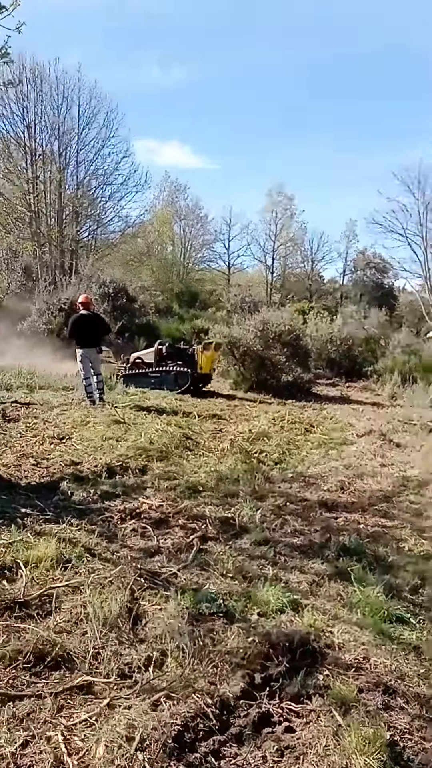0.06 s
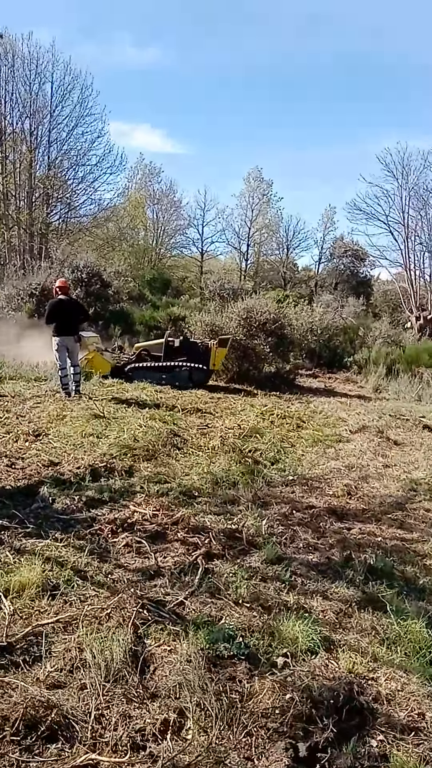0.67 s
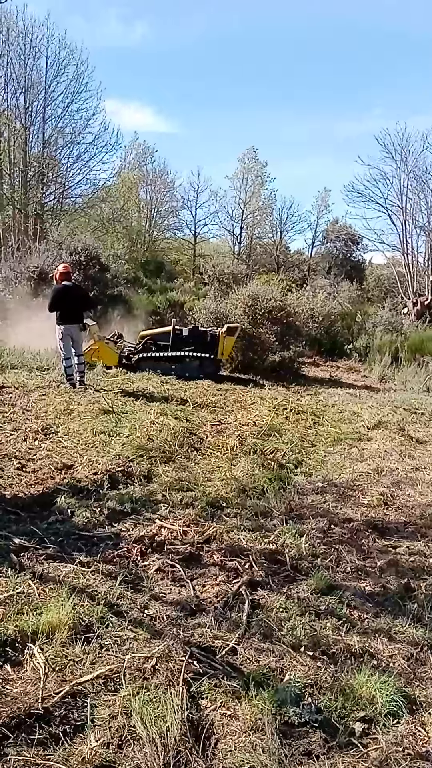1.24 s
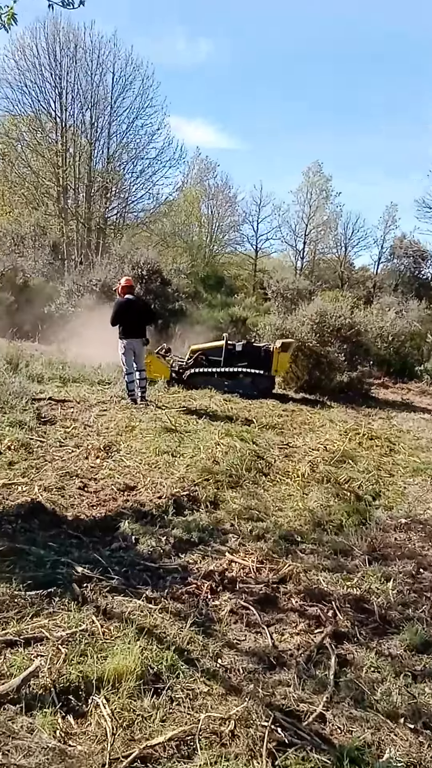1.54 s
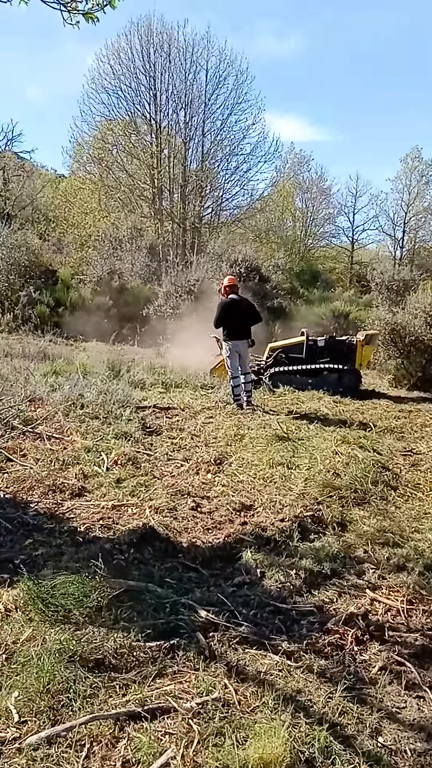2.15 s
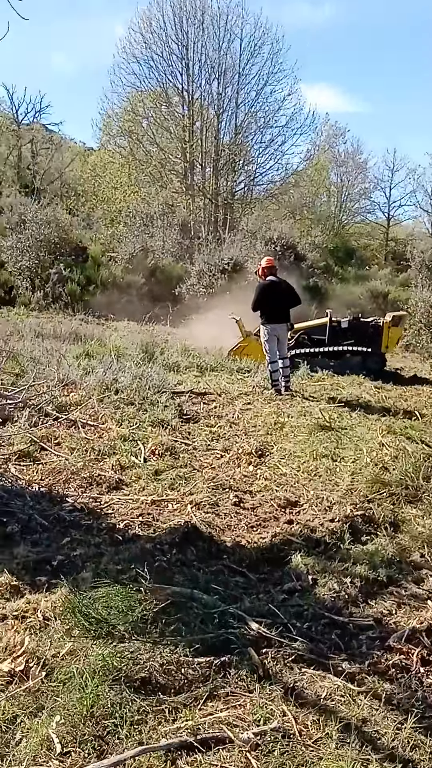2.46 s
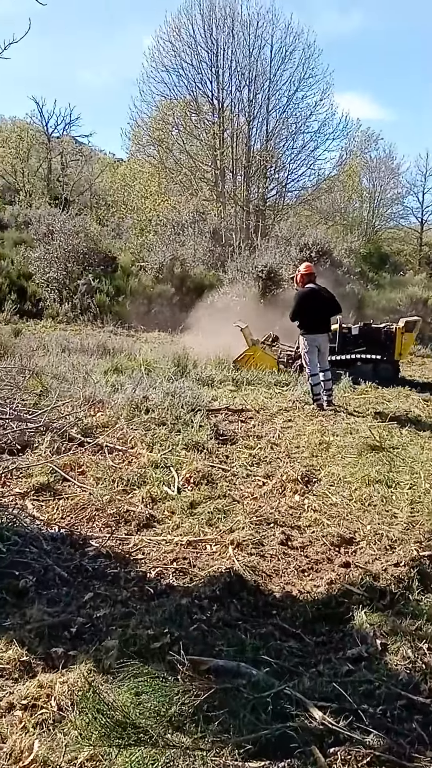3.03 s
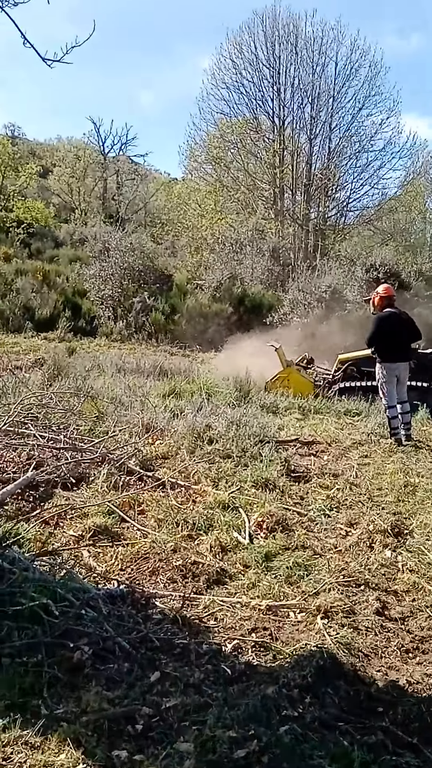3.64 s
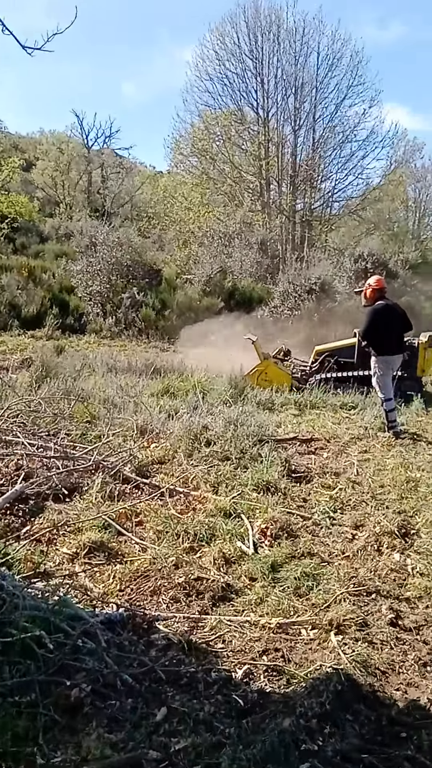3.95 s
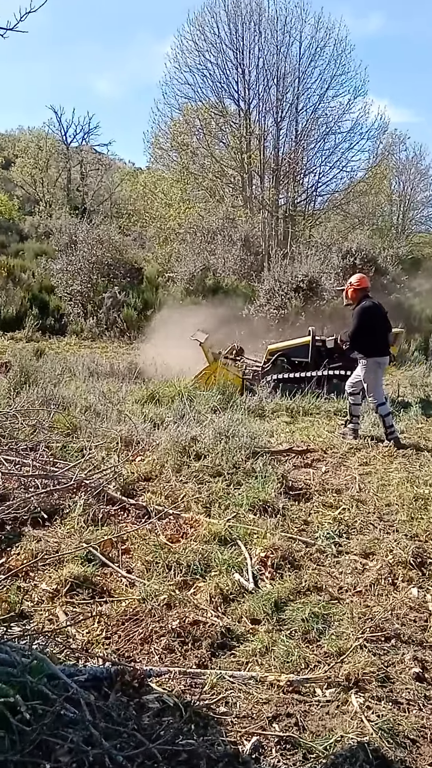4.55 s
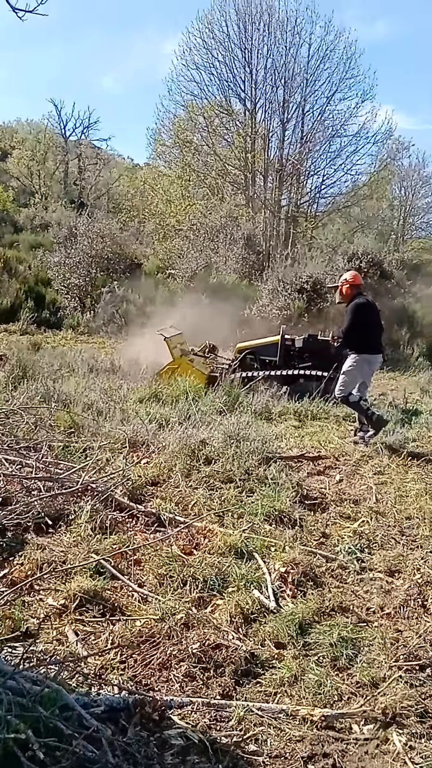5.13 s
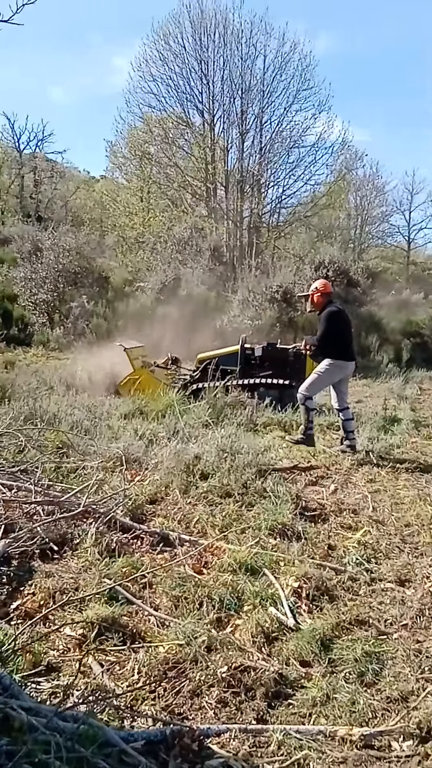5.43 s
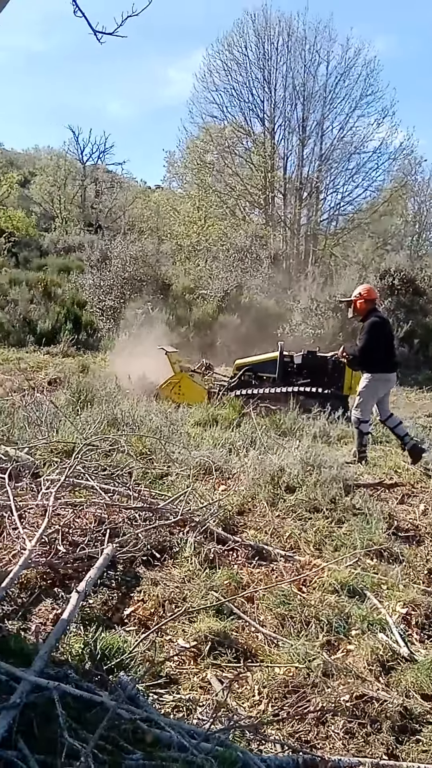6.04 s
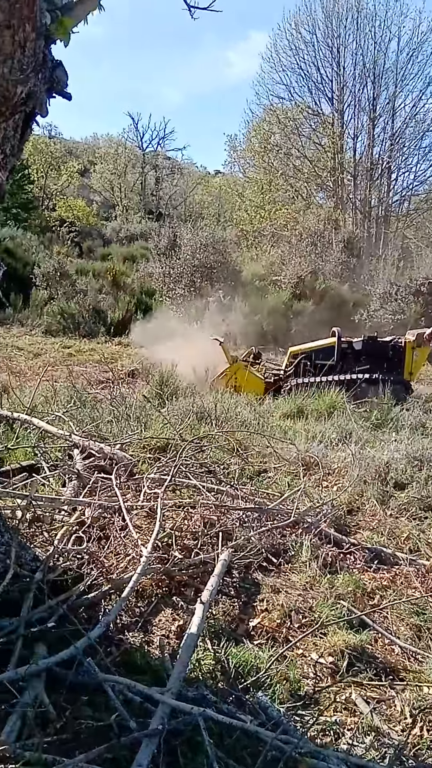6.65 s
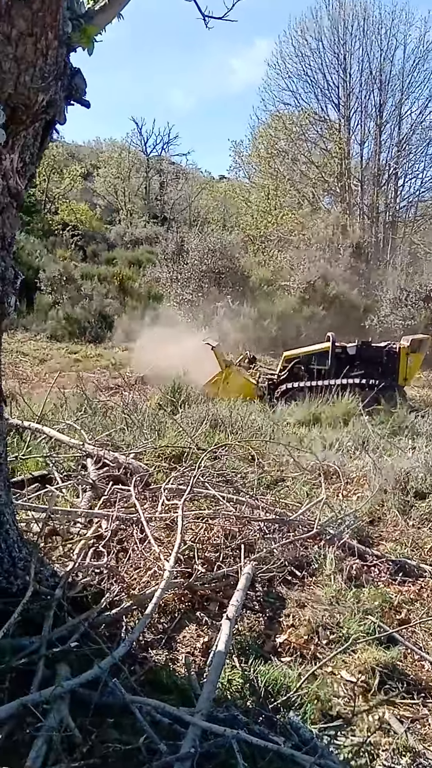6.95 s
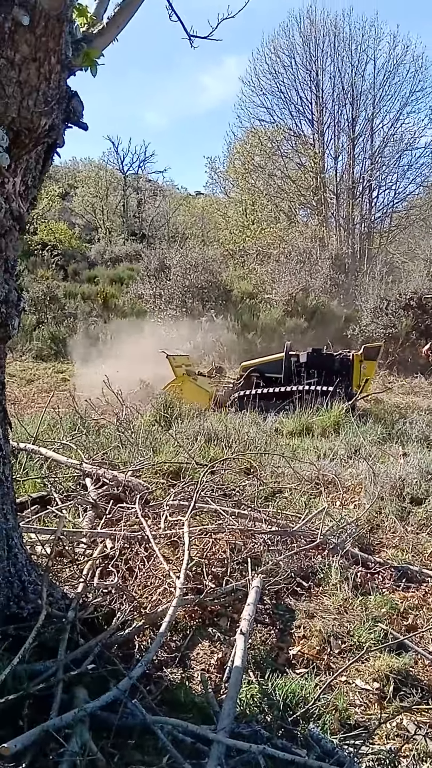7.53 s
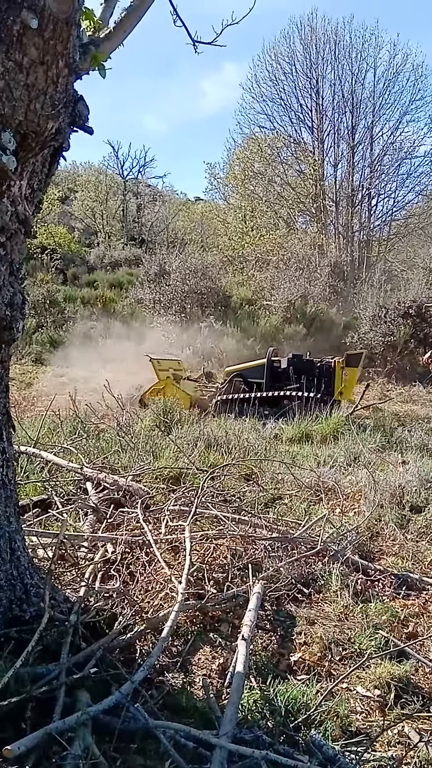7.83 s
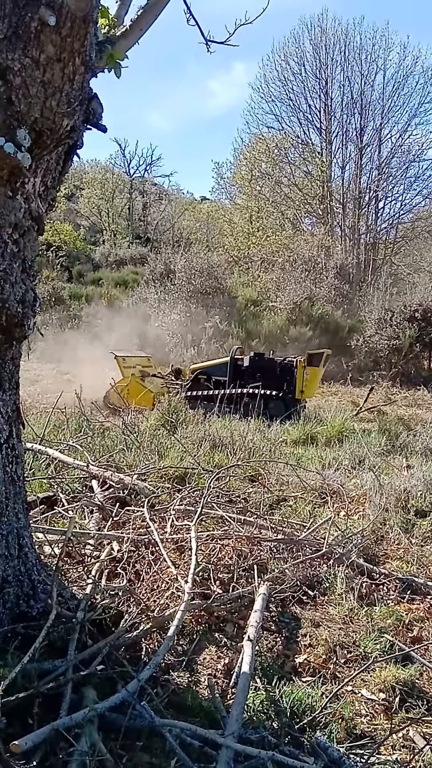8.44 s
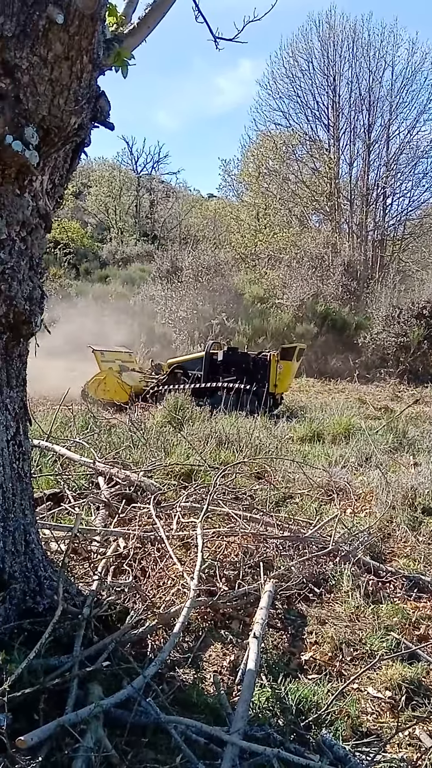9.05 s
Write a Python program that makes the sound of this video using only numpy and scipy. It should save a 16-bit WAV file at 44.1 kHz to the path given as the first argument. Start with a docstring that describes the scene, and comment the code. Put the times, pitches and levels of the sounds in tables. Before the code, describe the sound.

Outdoors, a diesel engine drones and clatters at constant high speed as a tracked brush cutter works at a distance. A fluttering whistle and a thinner whine swell and fade over the grainy hiss of shredding. Occasional wood cracks become a busy run of snapping past the middle. Wind thumps and rumbles on the microphone in gusts throughout.

```python
"""Dry brushland, with a tracked mulcher working some way off, its three-cylinder diesel near full speed.
The exhaust drones and whistles with every firing, the block knocks and the hydraulic pump hums.
The rotor's flails hiss and shred, twigs snap and thick sticks crack; a thin whine passes once.
Gusts of wind buffet the single microphone."""
import sys
import numpy as np
from scipy import signal
from scipy.fft import rfft, irfft, next_fast_len
from scipy.io import wavfile
from scipy.ndimage import map_coordinates

SR = 44100
rng = np.random.default_rng(int(sys.argv[2]) if len(sys.argv) > 2 else 0)


def master_out(mix):
    """Clip the mix to full scale and print it as 16-bit PCM to the path in sys.argv[1]."""
    frames = np.transpose(np.atleast_2d(mix))
    ceiling = np.clip(frames, -1, 1)
    pcm = np.round(ceiling * 32767).astype(np.int16)
    wavfile.write(sys.argv[1], SR, pcm)


N = 409688
CYLINDERS = 3  # firings in one engine cycle


def amp(db):
    """Decibels to gain."""
    return 10 ** (np.asarray(db) / 20)


def unit(x):
    """x at rms 1."""
    return x / np.sqrt(np.mean(x ** 2) + 1e-20)


def curves(rows):
    """One value per sample for each column after the time."""
    times, *columns = np.transpose(rows)
    return [np.interp(np.arange(N) / SR, times, column) for column in columns]


def wobble(rate):
    """A smooth random curve, rate knots a second."""
    knots = rng.standard_normal(int(N * rate / SR) + 4)
    return map_coordinates(knots, [np.arange(N) * rate / SR], mode="mirror")


def beat(turns, lag=0):
    """A cosine swing once a turn, peaking lag turns late."""
    return np.cos(2 * np.pi * (turns - lag))


def filtered(x, response):
    """x through a response given as a function of frequency."""
    size = next_fast_len(N + 8192)
    return irfft(rfft(x, size) * response(np.fft.rfftfreq(size, 1 / SR)), size)[:N]


def noise(spectrum, envelope=1):
    """Noise of rms 1, shaped in time, then coloured by (Hz, dB) points joined on a log axis."""
    points_hz, db = np.transpose(spectrum)
    white = envelope * rng.standard_normal(N)
    return unit(filtered(white, lambda hz: amp(np.interp(np.log(hz + 1), np.log(points_hz), db))))


def ringing(modes, hz):
    """The response of direct sound plus a few resonances."""
    return 1 + sum(amp(db) * 1j * hz * width / (centre ** 2 - hz ** 2 + 1j * hz * width)
                   for centre, width, db in modes)


# The exhaust's fader. Each row: time in seconds, level in dB.
EXHAUST_LEVEL = [(0, -25.5), (.8, -21.5), (1.15, -27), (1.7, -22.5), (3, -25.5), (4.5, -21), (5.3, -28),
                 (6.2, -29.5), (6.55, -22.5), (6.85, -29.5), (7.3, -26.5), (7.6, -30.5), (8.2, -28),
                 (9.29, -39)]
# The low drone. Each row: multiple of the engine cycle rate, relative level in dB.
DRONE_TONES = [(3, -11.5), (6, 0.5), (9, -6), (10, -18)]
# The dark rush of gas in the pipe. Each row: frequency in Hz, relative level in dB.
PIPE_COLOUR = [(25, -40), (45, -35), (62, -8), (100, -1), (125, 1), (200, 2), (245, -5.5), (275, -14.5),
               (420, -24), (600, -30), (1000, -58)]

def exhaust(firings, pipe_db=-7.5, uneven=0.045):
    """One pressure pulse per firing, unequal among the three cylinders, with rushing gas on it."""
    level_db, = curves(EXHAUST_LEVEL)
    cycle = firings / CYLINDERS
    drone = unit(sum(-amp(db) * beat(order * cycle) for order, db in DRONE_TONES))
    drone *= (1 + uneven * beat(cycle)) * amp(0.51 * wobble(21))
    gas = noise(PIPE_COLOUR, amp(0.82 * beat(firings)))
    return amp(level_db) * (drone + amp(pipe_db) * gas)


# The block's two faders. Each row: time in seconds, combustion knock in dB, valve clatter in dB.
BLOCK_LEVELS = [(0, -32, -31.5), (.3, -28.5, -33), (.85, -31, -33.5), (.98, -35, -39.5),
                (1.65, -29.5, -33.5), (2.45, -30.5, -35.5), (3.1, -31.5, -36), (3.7, -31, -35),
                (4.5, -29, -35.5), (5.3, -34, -35.5), (6.2, -34, -37.5), (6.65, -31, -35.5),
                (6.85, -34, -39.5), (7.3, -33.5, -37), (8.3, -32, -35.5), (9.29, -35.5, -40)]
# The pitched part of the knock. Each row: multiple of the engine cycle rate, relative level in dB.
BLOCK_TONES = [(27, -24.5), (29, -19.5), (30, -20.5), (31, -19.5), (32, -18.5), (33, -12), (34, -18),
               (35, -23), (37, -23.5), (42, -17.5), (43, -33), (48, -41), (51, -19.5), (60, -23), (63, -24)]
# Midrange rattle and brighter valve clatter. Each row: frequency in Hz, relative level in dB.
RATTLE_COLOUR = [(300, -20), (540, -17), (640, -7), (730, 1), (860, 2), (940, 5.5), (1050, -9.5),
                 (1200, -43), (2000, -52)]
VALVE_COLOUR = [(700, -18), (1050, -4), (1150, -2), (1290, -0.5), (1380, -5), (1500, -6), (1620, -3.5),
                (1770, -10.5), (1940, 1), (2050, -3), (2350, -1.5), (2520, -3.5), (2780, -23),
                (4000, -33.5)]

def block(firings, tones_db=-2, rattle_db=-6.0, valves_db=2, fade_db=2.0):
    """Combustion and valves knock in the block, partly alike each cycle."""
    knock_db, clatter_db = curves(BLOCK_LEVELS)
    cycle = firings / CYLINDERS
    # the tones come by many paths, and each fades on its own in the moving air
    tones = unit(sum(amp(db + fade_db * wobble(4)) * beat(order * cycle, rng.random())
                     for order, db in BLOCK_TONES))
    strikes = amp(0.81 * beat(2 * firings, 0.61) + 2 * beat(firings, 0.56))
    knock = amp(tones_db) * tones + amp(rattle_db) * noise(RATTLE_COLOUR, strikes)
    clatter = amp(clatter_db + valves_db + 1.3 * wobble(7.3)) * noise(VALVE_COLOUR, strikes)
    return amp(knock_db) * knock + clatter


# Swells as the tracks are steered. Each row: peak time, rise and fall in seconds, level in dB.
PUMP_SWELLS = [(4.55, 0.87, 0.2, -36), (6.7, 0.25, 0.13, -33)]

def pump(firings, order=36, idle_db=-43, waver_db=2.0):
    """The hydraulic pump hums in step with the crankshaft and swells under load."""
    t = np.arange(N) / SR
    cycle = firings / CYLINDERS
    load_power = sum(amp(db) ** 2 * np.exp(-((t - peak) / np.where(t < peak, rise, fall)) ** 2)
                     for peak, rise, fall, db in PUMP_SWELLS)
    hum = unit(beat(order * cycle) * amp(waver_db * wobble(25)))
    return np.sqrt(amp(idle_db) ** 2 + load_power) * hum


# How hard the gas pulses bend a whistle. Each row: time in seconds, pitch swing in Hz at a bend of 1.
PULSE_SWING = [(0, 120), (2.3, 114), (3.7, 93.5), (5.5, 71), (9.29, 67.9)]

def flow_tone(pitch_hz, level_db, firings, bend, flutter_hz, throb_db, sag, scatter, trim_db):
    """A whistle that each gas pulse pushes up and that sags in between; the brush scatters it."""
    swing_hz, = curves(PULSE_SWING)
    push = (beat(firings, 0.29) - sag * beat(2 * firings, 0.67)) * (1 + 0.16 * wobble(60))
    hz = pitch_hz + bend * swing_hz * push + flutter_hz * (wobble(260) + 0.396 * wobble(30))
    throb = amp(throb_db * push + 0.47 * wobble(110) + 0.89 * wobble(14))
    tone = unit(beat(np.cumsum(hz) / SR) * throb)
    t = np.arange(SR // 8) / SR
    brush_tail = rng.standard_normal(len(t)) * amp(-60 * t / 0.15)
    echo = unit(signal.fftconvolve(tone, brush_tail)[:N])
    return amp(level_db + trim_db) * unit(tone + scatter * echo)


# The high whistle and the lower whine. Each row: time in seconds, pitch in Hz.
WHISTLE_PITCH = [(0.0, 4340), (0.26, 4308), (1.6, 4345), (1.99, 4240), (2.69, 4328), (6.11, 4413),
                 (9.29, 4327)]
WHINE_PITCH = [(0, 2180), (.8, 2185), (1.1, 2146), (1.6, 2145), (2, 2205), (2.7, 2170), (4.4, 2195),
               (7.7, 2190), (8.8, 2208), (9.29, 2180)]
# Their faders. Each row: time in seconds, level in dB.
WHISTLE_LEVEL = [(0, -24.5), (.3, -24), (.62, -19), (.98, -30.5), (1.42, -23.5), (3.35, -26), (3.72, -21.5),
                 (4.04, -32), (4.7, -30), (4.9, -41), (5.08, -27.5), (6.1, -26.5), (6.6, -31), (7.2, -27),
                 (8.5, -23), (8.9, -35.5), (9.29, -27.5)]
WHINE_LEVEL = [(0, -32), (.65, -29), (1.1, -35), (1.5, -29), (2, -29.5), (2.45, -39), (2.75, -30.5),
               (3.05, -45), (3.55, -31.5), (4.1, -44), (4.65, -30.5), (4.95, -41), (6.15, -41),
               (6.6, -28.5), (6.85, -45), (7.5, -35), (8.6, -30), (9.29, -40.5)]

def exhaust_whistles(firings):
    """The pulsing gas sings a warbling whistle and a steadier whine about an octave below."""
    whistle = flow_tone(*curves(WHISTLE_PITCH), *curves(WHISTLE_LEVEL), firings, bend=0.93,
                        flutter_hz=49.96, throb_db=1.0, sag=0.2, scatter=0.4, trim_db=-2.0)
    whine = flow_tone(*curves(WHINE_PITCH), *curves(WHINE_LEVEL), firings, bend=0.46,
                      flutter_hz=19.78, throb_db=1.5, sag=0.18, scatter=0.46, trim_db=-3.0)
    return whistle + whine


# The rotor's fader. Each row: time in seconds, level in dB.
ROTOR_LEVEL = [(0, -35), (.6, -33), (.87, -36.5), (1.05, -40), (1.9, -33.5), (3.25, -35), (3.55, -32),
               (3.85, -36.5), (5.5, -37), (6.2, -36.5), (6.55, -31.5), (6.9, -36.5), (7.35, -38.5),
               (7.7, -35.5), (8.5, -37), (8.8, -39.5), (9.29, -41.5)]
# More spray escapes side-on. Each row: time in seconds, offset from the rotor's fader in dB.
SPRAY_SHARE = [(0, -20), (1.5, -17), (2.8, -14), (4.3, -10.5), (6.6, -11), (7.3, -15), (8.2, -9),
               (9.29, -14)]
# Bright hiss and airy spray. Each row: frequency in Hz, relative level in dB.
HISS_COLOUR = [(1500, -26), (2750, -5.5), (3100, 0.5), (3550, 0.5), (3800, -3), (4300, 4), (4700, 1),
               (5300, -3), (5750, -1.5), (6550, -4.5), (6850, -6.5), (7400, -11), (8000, -16), (14000, -37)]
SPRAY_COLOUR = [(5000, -20), (8000, 5), (9400, 5.5), (10500, 0), (12500, -3.5), (14000, -7), (14750, 13),
                (15700, 8), (16200, -34)]
# The ring of the steel hood. Each row: centre in Hz, width in Hz, strength in dB.
HOOD_MODES = [(4906, 166, 0.5), (6500, 160, -9)]

def rotor(firings, hiss_db=4.0, spray_db=-0.9, grain_db=2, spray_growth=0.33):
    """The flails tear air and twigs: a dense grainy hiss under the hood and a finer spray of chips."""
    rotor_db, = curves(ROTOR_LEVEL)
    share_db, = curves(SPRAY_SHARE)
    # the spray grows faster than the hiss
    fine_db = rotor_db + share_db + spray_growth * (rotor_db - rotor_db.mean())
    grain = amp(grain_db * wobble(700) + 0.49 * wobble(45) + 0.15 * beat(firings, 0.52))
    hiss = unit(filtered(noise(HISS_COLOUR, grain), lambda hz: ringing(HOOD_MODES, hz)))
    spray = amp(fine_db + spray_db + 0.8 * wobble(13)) * noise(SPRAY_COLOUR, grain)
    return amp(rotor_db + hiss_db) * hiss + spray


def ground_bounce(x, strength=0.2, delay_s=0.00094):
    """The ground returns a slightly later copy, which cuts evenly spaced dips in the spectrum."""
    return filtered(x, lambda hz: 1 + strength * np.exp(-2j * np.pi * hz * delay_s))


# Brush going into the rotor. Each row: time in seconds, average twigs a second.
TWIG_RATE = [(0, 12), (4.9, 3.5), (5.3, 37), (5.5, 16), (5.8, 52), (6.2, 25.3), (7.1, 47), (7.6, 84),
             (7.9, 30), (8.4, 13.4), (9.29, 8)]
# Sharp snap and fizzy chips, for twigs and sticks. Each row: frequency in Hz, relative level in dB.
SNAP_COLOUR = [(3600, -26), (4300, 5.5), (5000, 5), (6700, 3), (7500, -5.5), (8800, -19)]
CHIP_COLOUR = [(6500, -9), (8000, 1.5), (9700, 2), (11500, -12), (14000, -8), (15500, 0), (16500, -15)]

def twigs(snap_db=-42, chips_db=-50, spread_db=3, t60=0.049):
    """Small twigs snap at random, more often when more brush is fed in."""
    rate, = curves(TWIG_RATE)
    snaps = rng.random(N) < rate / SR
    sizes = amp(spread_db * np.minimum(rng.exponential(size=N), 3))
    decay = amp(-60 * np.arange(SR // 8) / SR / t60)
    force = signal.fftconvolve(snaps * sizes, decay)[:N]
    return force * (amp(snap_db) * noise(SNAP_COLOUR) + amp(chips_db) * noise(CHIP_COLOUR))


def gust(start, length, min_rise_s=0.016, rise_share=0.12, t60=0.31):
    """A gust rises, the more slowly the longer it is, holds and dies away."""
    t = np.arange(N) / SR - start
    rise = np.clip(t / (min_rise_s + rise_share * length), 0, 1)
    return rise * amp(-60 * np.clip(t - length, 0, 1) / t60)


# The bed of breeze. Each row: time in seconds, buffeting fader in dB, rumble fader in dB.
BREEZE_LEVELS = [(0, -51, -54), (2, -47, -53), (3.1, -52, -61), (4.3, -41.5, -56), (6.2, -42, -67),
                 (6.9, -50.5, -66), (7.8, -46.5, -66), (9.29, -36, -62)]
# Gusts on top. Each row: start and length in seconds, buffeting fader in dB, rumble fader in dB.
GUSTS = [(0.426, 0.11, -35.5, -46), (.56, 0.2, -39, -60), (.79, 0.32, -28.5, -50), (1.057, .24, -32, -53),
         (2.1, 0.051, -37, -52), (2.299, 0.094, -32, -43), (2.48, 0.045, -34.5, -39), (3.28, .12, -42, -58),
         (3.783, 0.12, -35.5, -56), (3.89, 0.037, -26, -49), (4.01, .05, -33, -42), (4.505, 0.17, -32, -57),
         (4.755, 0.048, -28, -44), (4.885, 0.25, -33.5, -59), (5.065, .68, -31, -63),
         (5.756, 0.47, -35, -68), (7.19, 0.076, -37.5, -61), (8.05, 0.051, -37, -60),
         (8.253, 0.035, -25, -53), (8.33, .09, -35.5, -56), (8.495, 0.22, -31.5, -41),
         (8.69, 0.23, -25.5, -48), (8.94, 0.31, -27, -51)]
# Gusts that catch the port's edge. Each row: start and length in seconds, level in dB.
RASP_GUSTS = [(5.45, 0.3, -33.5), (8.77, 0.1, -38), (9.044, 0.16, -29)]
# Thudding buffets, rough rasp and deep rumble. Each row: frequency in Hz, relative level in dB.
BUFFET_COLOUR = [(25, -32), (45, -21), (70, -4.5), (130, 3.5), (250, 1.5), (400, -2), (600, -7.5),
                 (900, -14), (1500, -22.5), (3000, -40), (8000, -70)]
RASP_COLOUR = [(250, -25), (550, 0), (1400, -5), (2200, -17), (5000, -45)]
RUMBLE_COLOUR = [(22, -18), (38, -19), (55, -4), (70, 0), (100, -4), (160, -13), (400, -60)]

def wind(buffet_db=5, rumble_db=6, lumps_db=2.0, swell_db=2.0):
    """Small eddies buffet the microphone port and rasp on its edge; large slow ones rumble."""
    gust_power = sum(np.outer(amp(levels_db), gust(start, length)) ** 2
                     for start, length, *levels_db in GUSTS)
    small_eddies, large_eddies = np.sqrt(amp(curves(BREEZE_LEVELS)) ** 2 + gust_power)
    lumps = amp(lumps_db * wobble(90) + 1.5 * wobble(45))
    edge_gusts = sum(amp(db) * gust(start, length) for start, length, db in RASP_GUSTS)
    rasp = edge_gusts * noise(RASP_COLOUR, lumps)
    buffet = amp(buffet_db) * small_eddies * noise(BUFFET_COLOUR, lumps)
    rumble = amp(rumble_db) * large_eddies * noise(RUMBLE_COLOUR, amp(swell_db * wobble(24)))
    return buffet + rasp + rumble


# Thick sticks breaking. Each row: start and length in seconds, relative level in dB, brightness in dB.
STICK_BREAKS = [(0.858, 0.02, -35, -1), (1.492, 0.024, -35, 6), (2.908, .018, -27, 2),
                (3.498, .05, -35, 10), (3.991, 0.011, -28, 10), (5.047, .018, -35.5, -1),
                (5.25, .008, -33.5, -1), (5.275, .01, -33, -1), (5.297, .008, -33, -1),
                (5.323, .009, -33, -3), (5.354, .012, -33, -4), (5.754, .04, -30, -5),
                (5.983, .04, -34, -5), (6.782, .012, -29.5, 1), (6.826, 0.0064, -32, 5),
                (6.873, .018, -36, -2), (7.097, 0.042, -32, 1), (7.212, .01, -32.5, 3),
                (7.296, 0.0067, -33, 5), (7.374, 0.0072, -35, 1), (7.485, .045, -30.5, 4),
                (7.541, .022, -26.5, 2), (7.59, .012, -30.5, -3), (7.693, .015, -33.5, -4),
                (7.735, .014, -32.5, -5), (7.79, 0.0088, -31, -5), (7.89, .012, -37, 11),
                (8.152, 0.01, -30, -3)]
# The woody body of a break. Each row: frequency in Hz, relative level in dB.
CRUNCH_COLOUR = [(600, -15), (1400, 5), (2400, 10), (3800, 12), (4500, -5), (5200, -28.5)]
# The brief ring of a struck flail. Each row: centre in Hz, width in Hz, strength in dB.
FLAIL_MODES = [(4330, 180, 4)]

def sticks(crunch_db=-0.6, snap_db=0.3, chips_db=-17.5, splinter_db=2.5, crack=0.81, t60=0.028):
    """Each stick cracks, splinters while the flails tear through it, then dies away."""
    t = np.arange(SR // 4) / SR
    colours = [CRUNCH_COLOUR, SNAP_COLOUR, CHIP_COLOUR]
    forces = np.zeros((len(colours), N + SR))
    attack = 1 + crack * amp(-60 * t / t60)
    for start, length, db, bright_db in STICK_BREAKS:
        burst = attack * amp(-60 * np.maximum(t - length, 0) / t60)
        blend = amp([crunch_db - bright_db, snap_db, chips_db + bright_db])
        onset = round(start * SR)
        forces[:, onset:onset + len(t)] += np.outer(amp(db) * blend, burst)
    splinters = amp(splinter_db * wobble(900))
    breaks = sum(force[:N] * noise(colour, splinters) for force, colour in zip(forces, colours))
    return filtered(breaks, lambda hz: ringing(FLAIL_MODES, hz))


# A thin whine fading in and out. Each row: time in seconds, pitch in Hz, fader in dB.
THIN_WHINE_PATH = [(6.15, 5400, -80), (6.3, 5400, -43), (6.55, 5290, -39), (6.72, 5430, -43),
                   (6.85, 5345, -80)]

def thin_whine(firings):
    """A brief flow tone above the whistle, only lightly bent by the gas pulses."""
    return flow_tone(*curves(THIN_WHINE_PATH), firings, bend=0.2,
                     flutter_hz=19, throb_db=0.5, sag=0, scatter=0.6, trim_db=3.5)


# The governed engine, near full speed. Each row: time in seconds, firings a second.
FIRING_RATE = [(0, 75.3), (.3, 75.1), (.9, 75.45), (1.2, 74.95), (1.5, 75.2), (2.1, 74.9), (3, 74.75),
               (3.3, 74.55), (4.5, 74.5), (4.9, 74.75), (5.4, 74.65), (6.2, 73.9), (6.6, 74.25),
               (7.6, 74.85), (8.1, 74.35), (9.29, 74.3)]

def scene():
    """The crankshaft times the drone, knock, pump, whistles and rotor; wind blows over the mono mix."""
    firing_hz, = curves(FIRING_RATE)
    firings = np.cumsum(firing_hz + 0.08 * wobble(18)) / SR  # running count of firings
    whistles = exhaust_whistles(firings) + thin_whine(firings)
    cutting = ground_bounce(rotor(firings) + sticks() + twigs())
    engine = exhaust(firings) + block(firings) + pump(firings)
    return (engine + whistles + cutting + wind())[None]


def record(dry, top_hz=15800):
    """A hard band limit cuts off the highest treble."""
    return filtered(dry[0], lambda hz: hz < top_hz)[None]


dry = scene()
out = record(dry)
master_out(out)
```